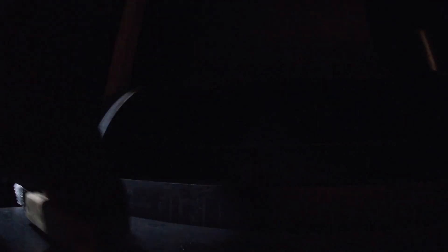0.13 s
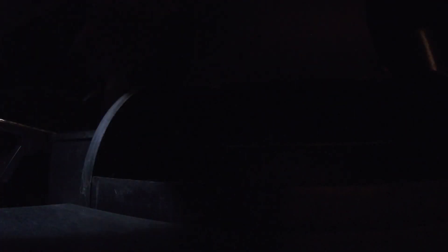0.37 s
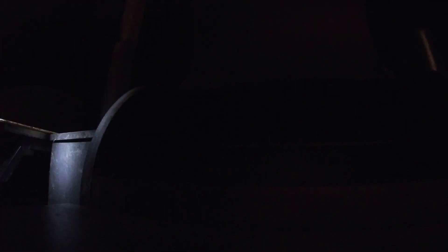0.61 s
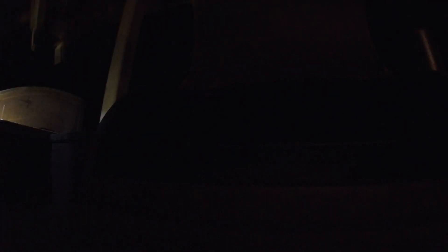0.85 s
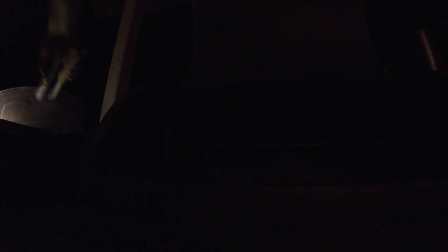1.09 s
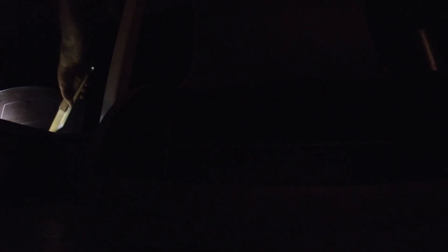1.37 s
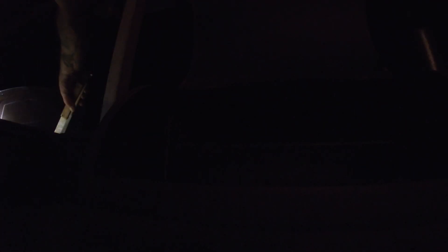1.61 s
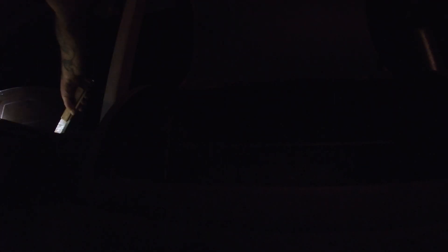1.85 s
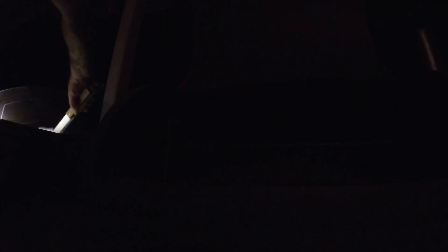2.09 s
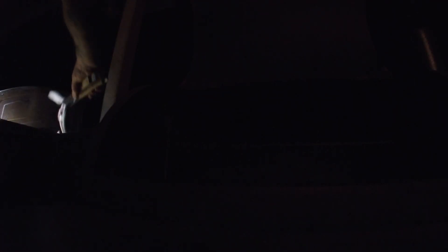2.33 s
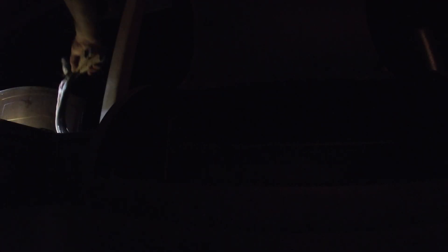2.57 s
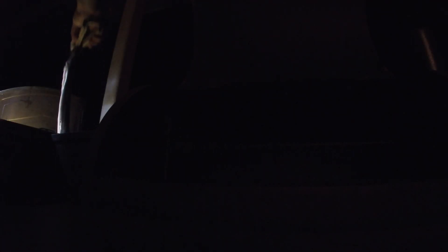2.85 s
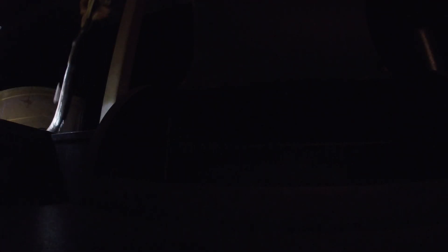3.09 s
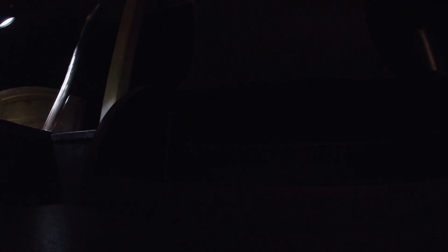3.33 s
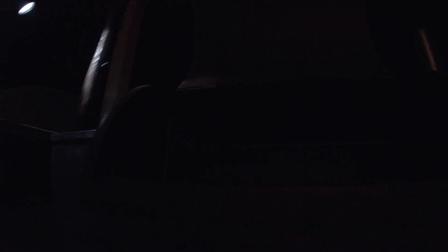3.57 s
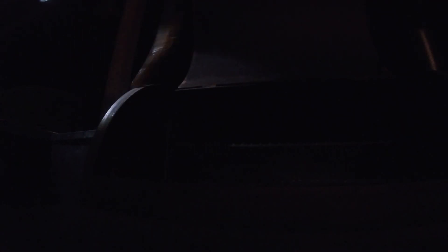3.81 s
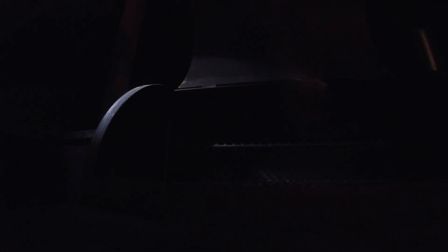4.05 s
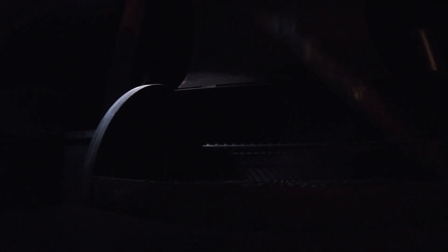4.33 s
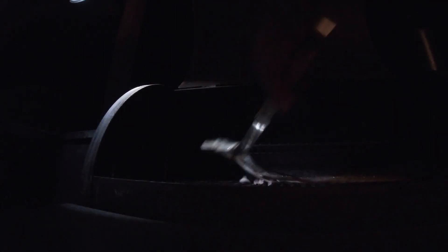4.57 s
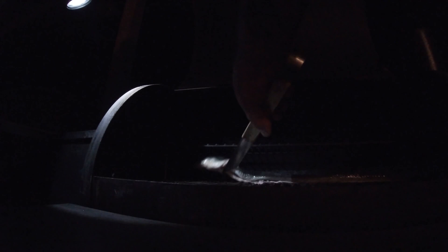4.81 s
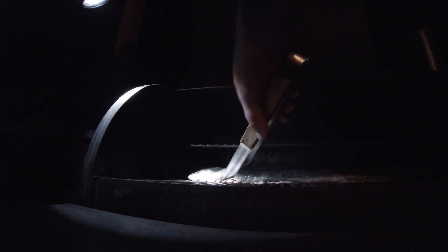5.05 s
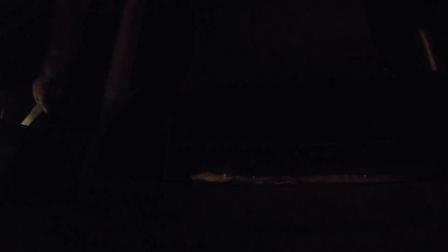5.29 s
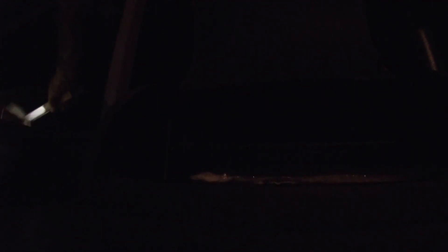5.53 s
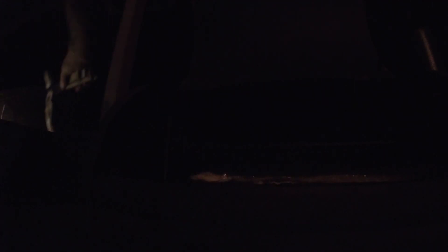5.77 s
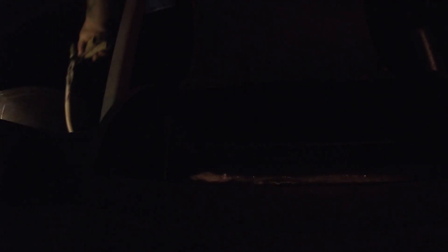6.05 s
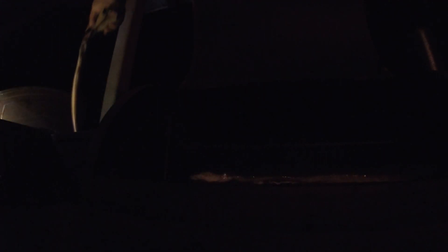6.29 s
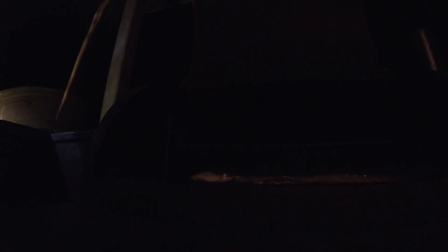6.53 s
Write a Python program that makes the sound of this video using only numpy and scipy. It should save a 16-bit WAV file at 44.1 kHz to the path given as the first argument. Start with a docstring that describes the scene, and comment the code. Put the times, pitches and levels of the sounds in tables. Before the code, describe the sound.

Close, dry outdoor capture of a grill. Quiet rumble cuts abruptly to a clattering metal knock and a continuous, bass-heavy fire roar with a wavering fan hum. Soft brushing touches come early; then only the roar as thin hissing slowly rises. Tongs make two crisp ticks, then a cluster of tiny clicks and scrapes as the sizzle swells. A deep motor hum starts near the end.

```python
"""Pellet grill with ticking tongs

A fan drives a fire whose roar booms in the steel barrel under a steady blade tone: shaped noise and sines.
After a blink of quieter noise the grill enters with a click; struck steel clanks and a hand brushes by.
Fine hiss, shaped noise, grows from about 2.4 s and is brightest near 5 s, while tongs tick on the grate
as cracks, rings and scrapes. A second click falls among the ticks; late on, the auger motor hums and
a faint whistle sinks, both plain sines."""
import sys
import numpy as np
from scipy import signal
from scipy.fft import rfft, irfft, next_fast_len
from scipy.io import wavfile
from scipy.ndimage import uniform_filter1d, minimum_filter1d

SR = 44100
rng = np.random.default_rng(int(sys.argv[2]) if len(sys.argv) > 2 else 0)


def decibels_to_gain(level_db):
    """Convert a level in decibels to a linear amplitude gain (20 dB per decade)."""
    exponent = np.asarray(level_db, float) / 20
    return 10 ** exponent


def wav_record(signal):
    """Record a signal, one row per channel, as 16-bit PCM in the file named by sys.argv[1]."""
    frames = np.transpose(np.atleast_2d(signal))
    bounded = np.clip(frames, -1, 1)
    # unit amplitude maps onto the largest positive 16-bit level
    quanta = np.round(bounded * 32767).astype(np.int16)
    wavfile.write(sys.argv[1], SR, quanta)


N = 293265  # length in samples


def evened(x):
    """Scales a sound to rms 1."""
    return x / np.sqrt(np.mean(x ** 2) + 1e-20)


def peaked(x, db):
    """Scales a sound to a peak level in dB."""
    return decibels_to_gain(db) * x / abs(x).max()


def read(points, hz):
    """Reads a spectrum curve in dB, interpolated along log frequency."""
    f, value = np.transpose(points)
    return np.interp(np.log(hz + 1), np.log(f + 1), value)


def humps(modes, hz):
    """Gain of a row of resonances standing on a flat floor."""
    gain = 1
    for f, width, db in modes:
        gain = gain + (decibels_to_gain(db) - 1) / (1 + (2 * (hz - f) / width) ** 2)
    return gain


def follow(rows, t):
    """Draws straight lines through the columns of a time table."""
    s, *columns = np.transpose(rows)
    return [np.interp(t, s, c) for c in columns]


def wander(hz):
    """Slow random drift of rms 1: sines of random phase up to hz, the slow ones strongest."""
    t = np.arange(N) / SR
    rates = np.geomspace(hz / 20, hz, num=20)
    return evened(sum(np.sin(2 * np.pi * (f * t + rng.random())) / np.sqrt(f) for f in rates))


def noise(shape, size, patchy_db):
    """Random short-time spectra of magnitude shape(Hz, s) with drifting patches."""
    hop = size // 4
    hz = np.fft.rfftfreq(size, 1 / SR)[:, None]
    t = np.arange(N // hop + 5) * hop / SR
    a, b, patches = rng.standard_normal((len(t), len(hz), 3)).T
    patches = uniform_filter1d(patches, size=size // 64, axis=0)  # blur over frequency
    patches = evened(uniform_filter1d(patches, size=8, axis=1))  # blur over time
    spectra = (a + 1j * b) * decibels_to_gain(patchy_db * patches) * shape(hz, t)
    return signal.istft(spectra, nperseg=size, noverlap=3 * hop)[1][:N]


def coloured(x, points):
    """Filters a sound by a spectrum curve in dB."""
    size = next_fast_len(len(x))
    gain = decibels_to_gain(read(points, np.fft.rfftfreq(size, 1 / SR)))
    return irfft(rfft(x, size) * gain, size)[:len(x)]


def add(mix, s, sound):
    """Mixes a sound in place from second s."""
    part = mix[round(s * SR):][:len(sound)]
    part += sound[:len(part)]


def ring(drive, modes, tilt_db):
    """Each mode is struck by the drive and dies away; tilt_db per octave pivots at 4 kHz."""
    t = np.arange(len(drive)) / SR
    body = np.zeros(len(t))
    for hz, db, t60 in modes:
        level_db = db + tilt_db * np.log2(hz / 4000) - 60 * t / t60
        body += decibels_to_gain(level_db) * np.sin(2 * np.pi * hz * t)
    return signal.fftconvolve(drive, body)[:len(t)]


# Spectrum of the quiet opening: pitch_hz, relative level_db
OPENING = [(20, -23), (50, 9), (110, -11), (270, -3.5), (370, -15), (600, -11), (1000, -14), (1500, -24),
           (1900, -22), (2600, -28), (3300, -28), (4200, -31.5), (5200, -28.5), (7000, -40), (9000, -51),
           (13000, -86)]
# Peaks of the microphone capsule: pitch_hz, width_hz, gain_db
CAPSULE = [(5025, 250, 11), (5800, 330, 4.5)]


def opening():
    """Quiet patchy noise, strongest in the low bass, with a trace of hiss."""
    level_db = -27
    sound = noise(lambda hz, t: decibels_to_gain(read(OPENING, hz)) * humps(CAPSULE, hz), size=2048, patchy_db=2.3)
    return decibels_to_gain(level_db) * evened(sound)


# Clicks, the first at the entry of the grill: start_s, peak_db
CLICKS = [(.1662, -18), (5.2063, -19)]


def clicks():
    """A sudden jump dying away at once: a click that falls with frequency."""
    out = np.zeros(N)
    decay_s = 0.00006
    for s, db in CLICKS:
        add(out, s, decibels_to_gain(db) * np.exp(-np.arange(SR // 100) / (decay_s * SR)))
    return out


# Course of the fire: time_s, boom_db, rush_of_air_db
FIRE = [(0.3, -15.5, -31.5), (0.55, -12.5, -33.5), (1.4, -12, -33.5), (2.3, -12.5, -33),
        (2.8, -14.5, -35.5), (5.1, -14.5, -32.5), (6.65, -14.5, -33)]
# Spectrum of the boom: pitch_hz, relative level_db
BOOM = [(30, -33.5), (57, -21.5), (80, -16), (100, -17.5), (130, -15), (155, -13.5), (190, -17.5),
        (215, -13.5), (270, -21), (305, -20), (325, -32), (345, -24.5), (360, -32.5), (450, -62),
        (900, -130)]
# Resonance of the barrel's air: pitch_hz, width_hz, gain_db
BARREL = (131.5, 21, 16)
# Spectrum of the rushing air: pitch_hz, relative level_db
RUSH = [(180, -24), (330, -5), (500, -6), (900, -12), (1300, -17), (2000, -26.5), (3000, -36),
        (4400, -42.5), (5400, -45.5), (6300, -66), (7500, -95.5), (10000, -120)]
# Peaks and dips of the steel panels: pitch_hz, width_hz, gain_db
PANELS = [(604, 19, -6), (697, 20, 5), (792, 29, 7.5), (850, 30, -7), (984.4, 30, 10), (1013, 46, -12.5),
          (1082, 18, 6), (1149, 43, 5.5), (1280, 45, -3), (1477, 20, 9), (1643, 27, 9), (1800, 57, 8.5),
          (2030, 79, -8), (2047, 45, 8.5), (2400, 130, 4), (3000, 140, 4.5), (4980, 140, 11)]


def fire():
    """Turbulent flame excites the barrel's air; the draught hisses through steel panels."""
    def boom_shape(hz, t):
        return decibels_to_gain(read(BOOM, hz)) * humps([BARREL], hz) * humps(PANELS, hz)

    def rush_shape(hz, t):
        return decibels_to_gain(read(RUSH, hz)) * humps(PANELS, hz)

    boom_db, rush_db = follow(FIRE, np.arange(N) / SR)
    boom = evened(noise(boom_shape, size=8192, patchy_db=0.0))
    rush = evened(noise(rush_shape, size=2048, patchy_db=0.7))
    boom = decibels_to_gain(boom_db + 1.0 * wander(6.5)) * boom
    rush = decibels_to_gain(rush_db + 0.12 * wander(8.1)) * rush
    return boom + rush


# Overtones of the blade tone: multiple, level_db relative to the fundamental
OVERTONES = [(2, -27.5), (3, -26), (4, -39)]


def fan():
    """Blades pass the housing: a slightly wavering tone with weak overtones, slowly getting softer."""
    blade_hz, level_db, sag_db_per_s = 238, -20, 0.5
    turns = np.cumsum(blade_hz + 0.37 * wander(6)) / SR
    tone = np.sin(2 * np.pi * turns)
    for k, overtone_db in OVERTONES:
        tone = tone + decibels_to_gain(overtone_db + 1.3 * wander(12)) * np.sin(2 * np.pi * k * turns)
    course_db = level_db - sag_db_per_s * np.arange(N) / SR + 1.4 * wander(7.0)
    return np.sqrt(2) * decibels_to_gain(course_db) * tone


# Course of the hiss: time_s, level_db, brightness (0 to 1)
HISS = [(.17, -77, 0.5), (2.4, -77, 0.03), (2.9, -67, 0.35), (3.6, -61, 0.4), (4.4, -59.5, 0.4),
        (4.95, -55, 1), (5.15, -52.5, .9), (5.27, -55.5, 0.63), (6.65, -56.5, 0.54)]
# Spectrum at brightness 0: pitch_hz, relative level_db
DULL = [(1300, -39), (2200, -10), (3500, -12), (4400, -14), (5100, -3), (6000, -15), (6700, -21),
        (8000, -33.5), (10000, -43.5), (12000, -62.5), (16000, -100)]
# Spectrum at brightness 1: pitch_hz, relative level_db
BRIGHT = [(1300, -33.5), (2200, -9), (3600, -9.5), (5000, -10), (6200, -10), (7500, -14), (10000, -24.5),
          (13000, -31), (15500, -51.5)]


def hiss():
    """Fine noise that swells and brightens; small random flickers brighten its treble."""
    flickers_per_s, flicker_db, flicker_decay_s = 23, -8, 0.0038

    def shape(hz, t):
        db, bright = follow(HISS, t)
        bright = np.clip(bright, 0, 1)
        colour_db = (1 - bright) * read(DULL, hz) + bright * read(BRIGHT, hz)
        return decibels_to_gain(db + colour_db) * humps(CAPSULE, hz)

    starts = (rng.random(N) < flickers_per_s / SR) * rng.exponential(1, N)
    flicker = signal.oaconvolve(starts, np.exp(-np.arange(SR // 40) / (flicker_decay_s * SR)))[:N]
    steady = noise(shape, size=512, patchy_db=1.0)
    treble = coloured(steady, [(4000, -7), (7500, 7), (11000, 8.5)])
    return steady + decibels_to_gain(flicker_db) * flicker * treble


# A hand brushes the grill: start_s, length_s, peak_db, treble_db
RUSTLES = [(0.171, 0.036, -32.5, 3), (0.77, 0.09, -38.5, 0), (0.811, 0.058, -37, -1.5),
           (1.212, 0.12, -46.5, 19), (1.524, .06, -44, 2), (1.838, 0.083, -43, 0.5)]
# Spectrum of the rubbing: pitch_hz, relative level_db
BRUSH = [(1200, -29), (2400, 2.5), (3800, -9), (6000, -19.5), (8000, -39), (12000, -83)]


def rustles():
    """Soft swells of rubbing noise."""
    out = np.zeros(N)
    for s, length, db, treble_db in RUSTLES:
        rub = coloured(rng.standard_normal(SR // 4), BRUSH)
        rub = coloured(rub, [(4000, 0), (12000, treble_db)])[:round(length * SR)]
        add(out, s, peaked(rub * np.hanning(len(rub)), db))
    return out


# Modes of the steel body: pitch_hz, level_db before tilt, t60_s
STEEL = [(450, -1, .25), (600, -3, .25), (721, -8, .35), (926, -11, .3), (1200, -4, .24), (1410, -1, .22),
         (1647, -8, .28), (1793, -4, .12), (2005, -9, .28), (2288, -10, .23), (2347, -12, .19),
         (2552, -9, .2), (2487, -16, .3), (2751, -17.5, .55), (2789, -16, .46), (3198, -20, .26),
         (3397, -15, .13), (3774, -22, .2), (4587, -28, .2)]
# Blows on the steel body: start_s, rattle_peak_db, rattle_decay_s, ring_db relative to the rattle
CLANKS = [(.185, -27, .03, -30), (.203, -19, 0.019, -30), (0.2153, -6, 0.008, 2), (.2195, -4, 0.016, -14),
          (.238, -13, 0.025, -8), (.258, -18, .02, -14)]
# Spectrum of the rattle: pitch_hz, relative level_db
RATTLE = [(150, -10.5), (350, 0), (550, -2.5), (900, -5), (1400, -2), (2100, -11), (2700, -11.5),
          (3500, -19), (5000, -29.5), (8000, -50), (12000, -75.5)]


def clanks():
    """A short rattling contact sets the steel ringing."""
    out, t = np.zeros(N), np.arange(SR // 2) / SR
    blow = np.sin(np.pi * np.minimum(t / 0.0002, 1)) ** 2  # one push of 0.2 ms
    for s, db, contact, ring_db in CLANKS:
        rattle = coloured(rng.standard_normal(len(t)), RATTLE)
        rattle = rattle * np.exp(-t / contact) * np.minimum(t / 0.0009, 1)
        ringing = ring(blow, STEEL, 0.33)
        add(out, s, peaked(rattle, db) + peaked(ringing, db + ring_db))
    return out


# Modes of the tongs: pitch_hz, level_db before tilt, t60_s
TONGS = [(1840, -7.5, .04), (2960, 1, 0.032), (3290, -8.5, 0.04), (3860, -7.5, 0.037), (5070, -2.5, .04),
         (5700, 1.5, 0.031), (6550, -9.5, 0.046), (6970, -3.5, 0.049)]
# Touches on the grate: start_s, peak_db, tilt_db_per_octave, treble_db, crack_decay_s
TICKS = [(4.2065, -20.5, 4, -2, 0.0017), (4.2194, -23, 4, -3, .002), (4.725, -33.5, 2, 3.5, .002),
         (4.764, -31.5, -4, 2, .002), (4.798, -34, -0.5, 1, .002), (4.8463, -34, 8, 4, 0.0022),
         (5.005, -21, -9.5, 2, .003), (5.008, -18, 0.5, 6, 0.0064), (5.098, -22, -7, 7, .004),
         (5.21, -27.5, -1, -7, 0.0016), (5.268, -37, 7.5, 11, 0.0046), (5.3657, -29, -4, 15, 0.0011),
         (5.3718, -28, -14.5, -6, 0.0015), (5.459, -44.5, 0, 9, .002), (5.7802, -38.5, 9, 7, .003)]
# Spectrum of the scrape: pitch_hz, relative level_db
SCRAPE = [(900, -24.5), (1800, -10.5), (2900, -3.5), (3800, -3.5), (5500, 2), (8000, -11), (12000, -35.5),
          (15000, -48)]


def ticks():
    """Tongs touch the grate: a crack, a brief ring, a scrape."""
    rise_s, scrape_db, scrape_t60_s = 0.00025, -12.5, 0.27
    out, t = np.zeros(N), np.arange(SR // 4) / SR
    fade = 1 - t / t[-1]
    for s, db, tilt_db, treble_db, crack in TICKS:
        decay = np.exp(-t / crack) + decibels_to_gain(scrape_db - 60 * t / scrape_t60_s)
        touch = (1 - np.exp(-t / rise_s)) * decay * fade
        tint = [(2900, -tilt_db), (4500, 0.002), (7000, 0.0046), (12000, treble_db)]
        grain = coloured(rng.standard_normal(len(t)), tint)
        scrape = touch * coloured(grain, SCRAPE)
        ringing = ring(scrape * touch, TONGS, tilt_db)
        tick = peaked(ringing, -7.0) + peaked(scrape, -0.87)
        add(out, s, peaked(tick, db) * fade)
    return out


def auger():
    """The feed motor is a plain low sine that rises quickly once it is switched on."""
    hum_hz, level_db, start_s, rise_s = 56, -24, 5.58, 0.08
    t = np.maximum(np.arange(N) / SR - start_s, 0)
    swell = 1 - np.exp(-t / rise_s)
    return np.sqrt(2) * decibels_to_gain(level_db) * swell * np.sin(2 * np.pi * hum_hz * t)


# A thin whistle: start_s, length_s, level_db, pitch_hz, glide_hz_per_s
SQUEAK = (5.945, .13, -76, 10050, -1500)


def squeak():
    """A faint high sine that sinks a little."""
    s, length, level_db, hz, glide = SQUEAK
    out, t = np.zeros(N), np.arange(0, length, 1 / SR)
    swell = np.sqrt(np.sin(np.pi * t / length))
    whistle = np.sin(2 * np.pi * (hz + glide * t / 2) * t)
    add(out, s, np.sqrt(2) * decibels_to_gain(level_db) * swell * whistle)
    return out


def scene():
    """The quiet opening gives way to the whole grill at the first click."""
    grill = fire() + fan() + hiss() + rustles() + clanks() + ticks() + auger() + squeak()
    entry_s = CLICKS[0][0]
    mix = np.where(np.arange(N) < entry_s * SR, opening(), grill)
    return (mix + clicks())[None]


def roll_off(x):
    """The treble ends steeply here."""
    return signal.sosfilt(signal.butter(12, 15800, fs=SR, output="sos"), x)


def record(dry):
    """A limiter turns the loudest peaks smoothly down."""
    limit_db = -3.5
    top = -minimum_filter1d(-abs(dry), size=SR // 60)  # highest peak nearby
    over_db = np.maximum(20 * np.log10(top + 1e-9) - limit_db, 0)
    over_db = uniform_filter1d(over_db, size=SR // 150)
    over_db = uniform_filter1d(over_db, size=SR // 150)
    mix = dry * decibels_to_gain(-0.7 * over_db)  # takes off 0.7 dB per dB over the limit
    return roll_off(mix)


dry = scene()
out = record(dry)
wav_record(out)
```